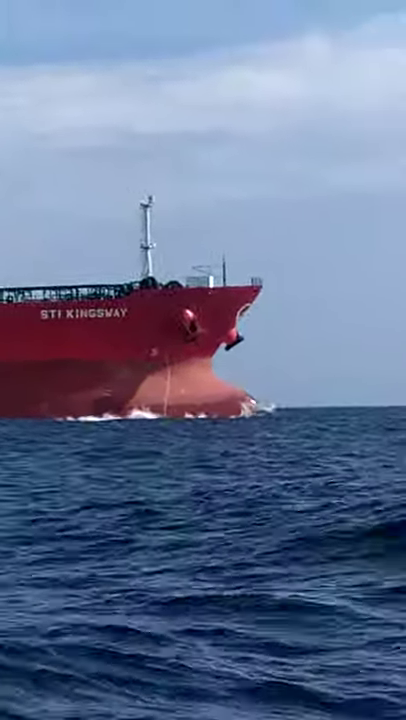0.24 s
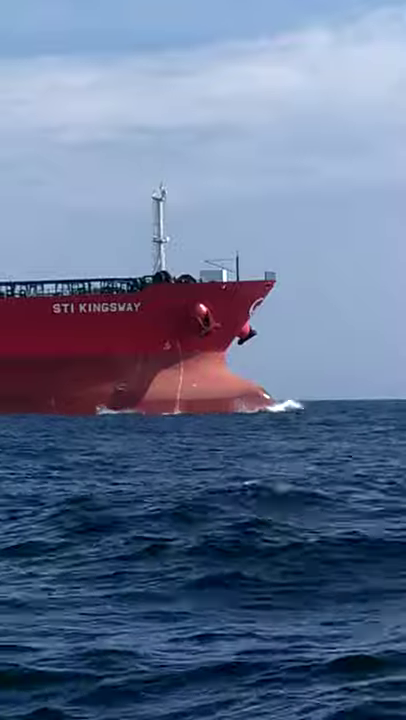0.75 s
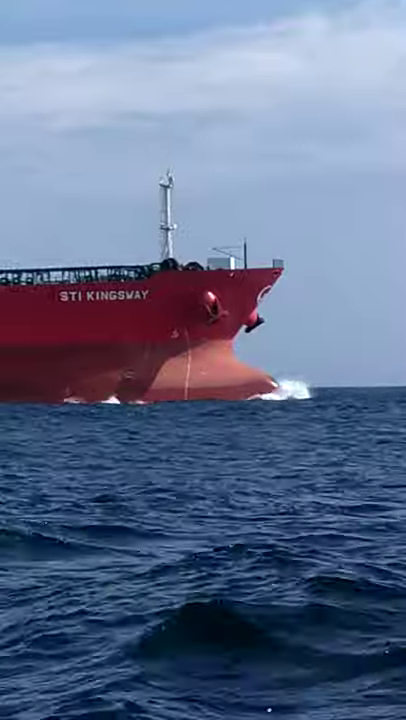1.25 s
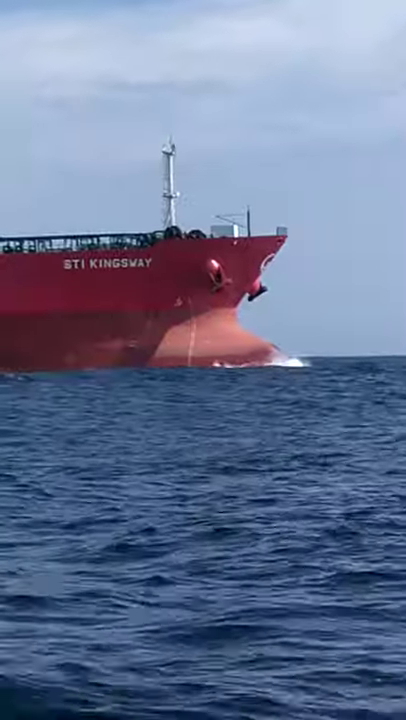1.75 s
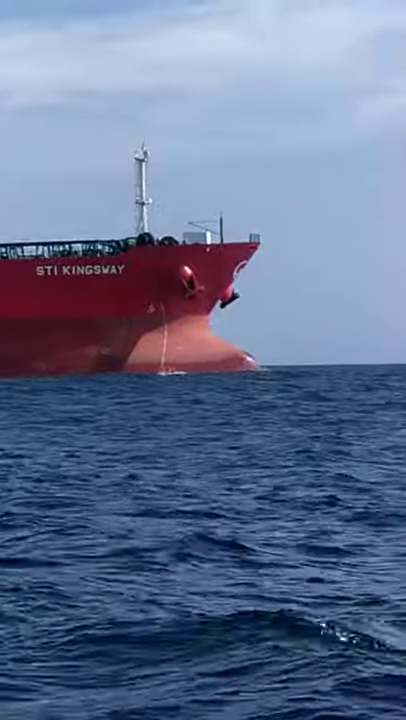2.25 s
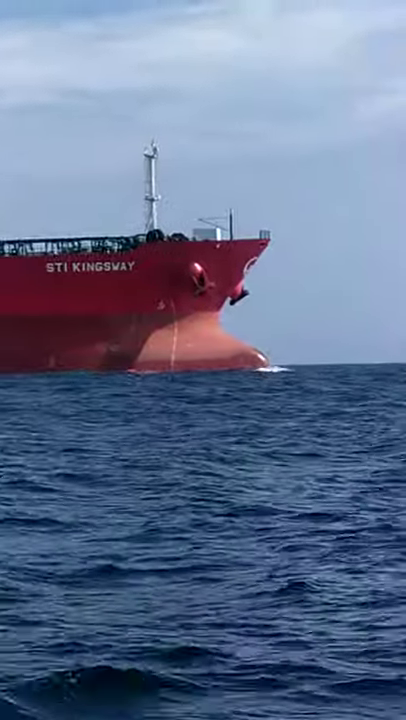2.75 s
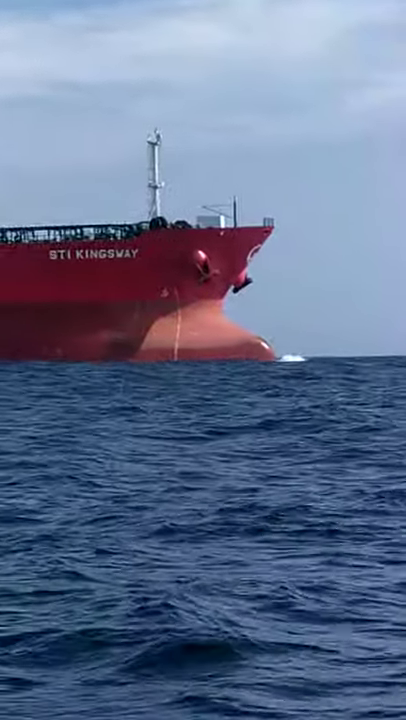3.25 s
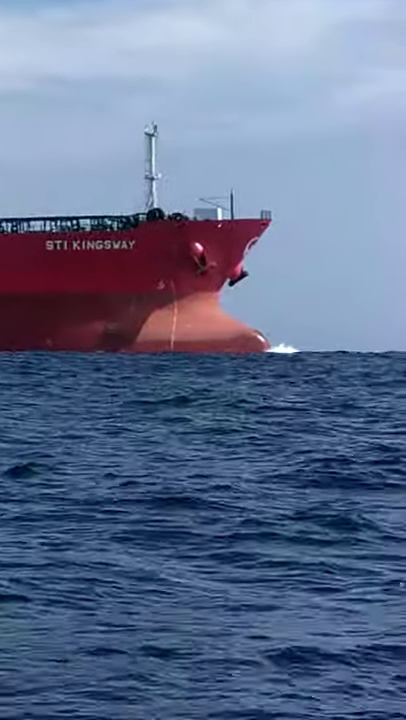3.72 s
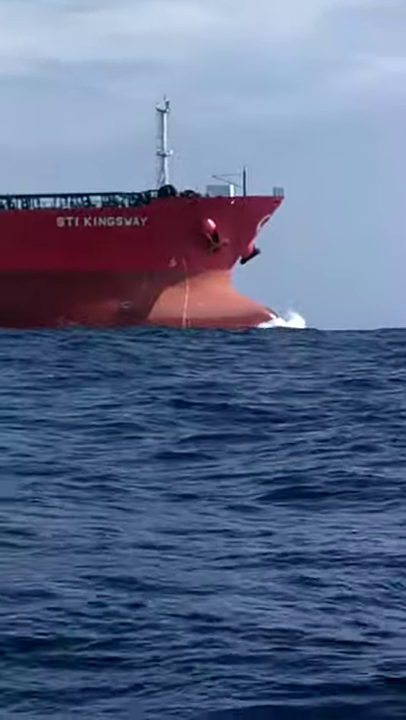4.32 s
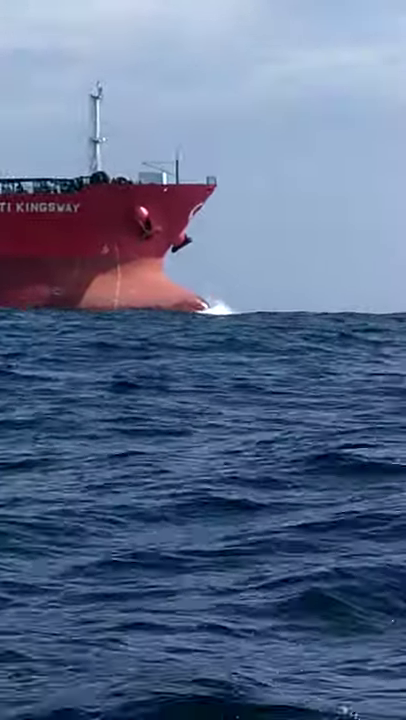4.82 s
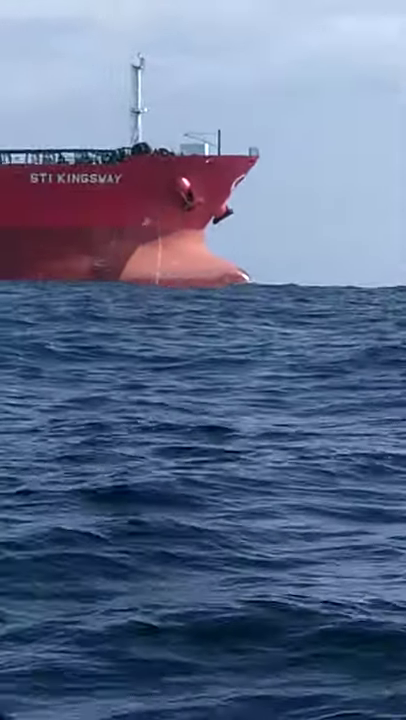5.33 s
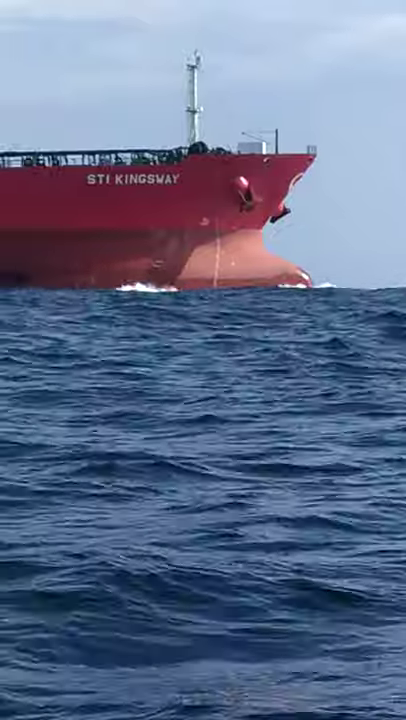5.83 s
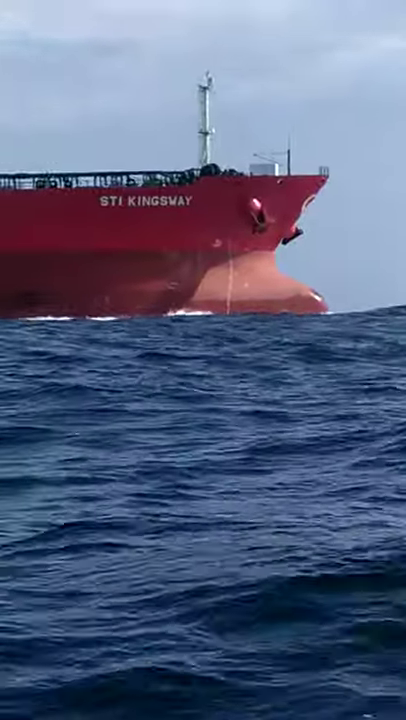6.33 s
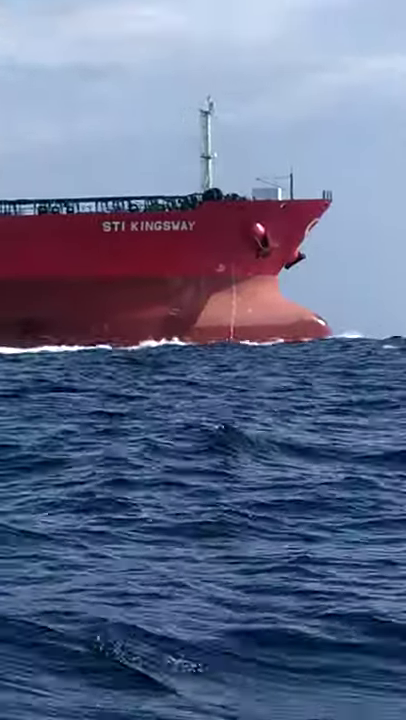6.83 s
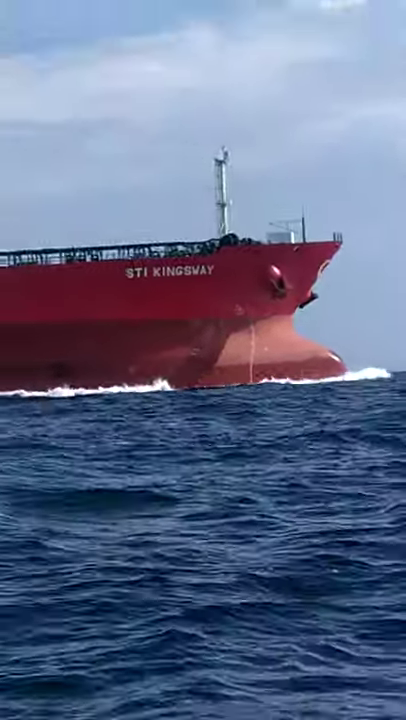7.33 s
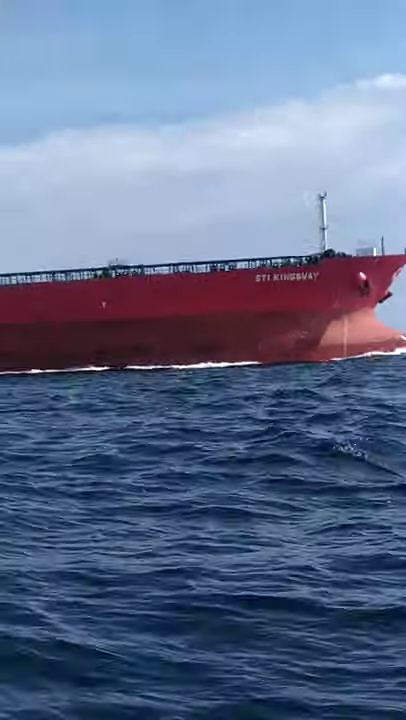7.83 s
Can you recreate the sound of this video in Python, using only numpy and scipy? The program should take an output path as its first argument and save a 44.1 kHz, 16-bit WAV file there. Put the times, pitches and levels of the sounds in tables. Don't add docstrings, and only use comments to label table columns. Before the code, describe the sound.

At sea, heard from a small motorboat, a big ship's low horn is already sounding, holds for over two and a half seconds and cuts off. The boat engine drones and ticks in the gap amid wind buffeting and light spray. A second long blast then holds to the end while the engine slows and a loose panel rattles. Stereo handheld microphone, overloaded by wind.

```python
import sys
import numpy as np
from scipy import signal
from scipy.io import wavfile
from scipy.ndimage import uniform_filter1d, minimum_filter1d

SR = 44100
rng = np.random.default_rng(int(sys.argv[2]) if len(sys.argv) > 2 else 0)


def decibels_to_gain(level_db):
    exponent = np.asarray(level_db, float) / 20
    return 10 ** exponent


def master_out(mix):
    frames = np.transpose(np.atleast_2d(mix))
    ceiling = np.clip(frames, -1, 1)
    pcm = np.round(ceiling * 32767).astype(np.int16)
    wavfile.write(sys.argv[1], SR, pcm)


N = 355887

# time_s, level_db, echo_path_ms (extra path
BLASTS = [
    [(0.0, -15.5, 3.5), (0.22, -10, 2), (0.65, -11, 3.5), (0.8, -14, 5), (1.67, -13, 3), (1.9, -19.5, 4),
     (2.01, -11.5, 3.5), (2.63, -13, 4), (2.68, -36, 6)],
    [(4.94, -35, 1), (4.97, -17.5, 2), (5.02, -10, 2.5), (5.87, -10.5, 2.5), (6.16, -12, 2.5),
     (6.5, -10.5, 3), (6.85, -11.5, 3), (7.3, -10.5, 3), (8.07, -10.5, 2.5)],
]
HORN_PITCHES = [135.26, 135.7]
HORN_PARTIALS = [0.5, -7.5, -19.5, -30.5, -26, -35, -40]
HORN_LAG_S = 0.000083
SEA_ECHO = 0.69
HORN_PAN_DB, HORN_SWAY_DB = 1.5, 1.5

# time_s, firing_hz
ENGINE_SPEED = [(0, 67.4), (1, 67.4), (1.4, 60.5), (1.9, 66.5), (2.56, 66.5), (3, 63.7), (3.3, 63.5),
                (3.86, 66.3), (4.3, 65.6), (4.56, 62.4), (4.9, 56.6), (5.1, 57.6), (5.5, 60.5), (6.3, 61.5),
                (6.6, 58.5), (6.95, 43.8), (7.25, 48), (8.07, 51.8)]
# time_s, drive_db
DRIVE = [(0, 2.5), (.75, 1), (1.15, -3), (1.75, -1), (2.5, 1), (2.76, 2), (3.1, 2), (3.4, 2), (3.62, 4),
         (4.2, 4.5), (4.67, 1), (5.06, 1), (5.6, -0.5), (6.6, -1.5), (6.9, -5), (7.35, -4), (7.8, 1),
         (8.07, -8)]
# firing_hz, level_db
EXHAUST = [(44, -29), (51, -24), (57, -20.5), (61, -25), (64, -22.5), (66.5, -19.5), (67.5, -22)]
# hum_hz, level_db
HUM = [(90, -21), (100, -37), (113, -15), (121, -22.5), (128, -20), (131, -22), (134, -32)]
# order (multiple of the firing rate), level_db
UPPER_ORDERS = [(1.5, -17.5), (2.5, -19), (3, -17), (4, -17), (5, -14.5), (6, -13), (7, -15.5), (7.5, -21),
                (8, -14), (9, -19), (10, -16.5), (11, -18.5), (11.5, -21.5), (12, -20.5), (13, -19),
                (14, -16.5)]
# pitch_hz, gain_db
HULL = [(100, 9), (300, -15.5), (400, -1), (465, -1), (540, -6), (630, -10), (705, -0.5), (780, -7.5),
        (900, -11)]
# pitch_hz, width_hz, level_db
CASING = [(752, 57, 5.5), (1216, 286, 2), (1650, 300, -5.5), (2100, 640, -8)]
# middle_s, length_s, lift_db
TICKING = [(.24, 0.43, 9.5), (.65, 0.52, 6), (1.5, 0.68, 7), (2.3, 0.86, 6.5), (2.8, 0.31, 13),
           (3.2, .3, 9), (3.65, 0.7, 9), (4.4, 0.46, 13), (4.95, 0.33, 5), (5.9, 0.57, 10.5), (6.4, .4, 3),
           (6.9, 0.46, -9), (7.75, 0.23, 6.5)]
# middle_s, length_s, lift_db
BUZZING = [(.3, 0.74, 6), (2.8, .25, 8), (3.9, 0.97, 11), (4.7, 0.16, 12.6), (5.1, 0.4, 15),
           (5.5, 0.42, 14), (6.1, .6, 9.9), (7.22, 0.19, 17.3), (7.48, 0.51, 14.6), (7.85, 0.34, 11)]
BEAT_FOLLOWS, UPPER_FOLLOWS, CASING_FOLLOWS = 0.4, 0.72, 1.0
UPPER_DB, CASING_DB = -21.5, -41
TICK_DB, BUZZ_DB = -43, -51
TICK_HZ, TICK_WIDTH_HZ, TICK_PAN_DB = 2222, 45, -7
BUZZ_HZ, BUZZ_WIDTH_HZ = 1345, 60
CASING_TOP_HZ, CASING_PAN_DB = 2440, 3.5
FIRING_KNOCK = 28
ENGINE_LEAD = 5

# time_s, level_db, brightness_db
WIND = [(0, -19, -4), (.1, -26.5, -15), (.7, -25, -5), (1.1, -23.5, -7), (1.5, -22, -12), (1.9, -24.5, -2),
        (2.6, -23.5, -16.5), (3.3, -26.5, -5.5), (3.7, -25, -16), (4.5, -23.5, -11.5), (4.65, -29.5, -6.5),
        (5.5, -29, -13), (6.2, -28, -16.5), (7.4, -30.5, -6), (8.07, -26, -17.5)]
# pitch_hz, density_db (per Hz)
WIND_COLOUR = [(20, -6), (50, 11.5), (90, 12), (200, 5), (400, -5), (600, -12.5), (1200, -27), (2500, -55),
               (5000, -61)]
# middle_s, length_s, lift_db
GUSTS = [(.82, 0.13, 6.5), (1.28, 0.16, 8), (1.44, .08, 3.5), (1.8, 0.22, 6), (2.05, 0.12, -6),
         (2.17, 0.095, 4.5), (2.42, 0.071, 0), (2.8, 0.22, 2.5), (3.28, 0.22, 3), (3.5, 0.11, -8.5),
         (4.2, 0.071, 3.5), (4.49, 0.072, 3.5), (6.12, 0.16, 7), (6.46, 0.074, 5), (6.7, 0.17, -4.5),
         (6.9, .1, 5), (7.9, 0.1, 5.5)]
WIND_PAN_DB, WIND_SWAY_DB = 2, 4.0
COARSE = 16

# pitch_hz, density_db (per Hz)
SPRAY_COLOUR = [(1470, -30), (2500, 0), (3140, -5), (4300, -7.5), (6290, -5.5), (11000, -10),
                (13600, -18.5), (15500, -22)]
# middle_s, length_s, lift_db
SPLASHES = [
    (1.73, .1, 0.5),
    (3.53, 0.21, 1),
    (3.84, 0.015, 2.5),
    (4.72, 0.046, -1.5),
    (5.02, 0.097, 3.5),
    (5.13, 0.11, 3),
]
SPRAY_DB, SPRAY_FOLLOWS = -39.5, 0.63
SPLASH_TOP, SPRAY_TOP_DB = 3, -1.5

# start_s, peak_db, left_right_db
POPS = [(0.097, -27, 1), (0.557, -19, 1), (1.093, -30, 1.5), (1.303, -6, 6), (1.432, -21, -9),
        (1.495, -14, 24), (1.729, -18, 15), (1.778, -22, -16), (1.852, -7.5, 7), (1.902, -15, 10),
        (2.203, -23, -2.5), (2.638, -20, 6.0), (3.267, -7.5, -23), (3.303, -10, -10), (4.17, -10, -16),
        (6.142, -15, 18), (6.233, -16, -2), (6.858, -15, 19)]

# start_s, stop_time_ms, direction (+1 or -1), port (0 left, 1 right)
LONG_SHOVES = [(0.857, 7, 1, 0), (0.876, 9, -1, 0), (1.062, 7.5, 1, 0), (1.082, 12.5, -1, 0),
               (1.211, 5.5, 1, 0), (1.483, 6, 1, 0), (1.674, 5.5, -1, 0), (1.819, 6.5, -1, 1),
               (1.835, 10.5, -1, 1), (1.931, 5.5, 1, 0), (2.152, 6, -1, 0), (2.187, 5.5, 1, 0),
               (3.011, 6.5, 1, 0), (3.306, 9.5, 1, 0), (3.374, 11, -1, 0), (3.556, 6.5, 1, 0),
               (3.698, 7, -1, 0), (3.961, 7.5, 1, 0), (6.073, 11, 1, 1)]
SHORT_SHOVES_PER_S, SHOVE_WIND_DB = 9, -22
SHORT_MIN_MS, SHORT_MAX_MS, RIGHT_SHARE = 3, 5, .15
STOP, SHOVE, SHOVE_RAMP_S = 0.83, 1.94, .0035

# time_s, peak_db
RATTLE = [(7.002, -30), (7.0497, -25), (7.1051, -29), (7.1477, -26), (7.196, -14.5), (7.2727, -18),
          (7.3444, -18.5), (7.3917, -17.5), (7.4438, -15.5), (7.5144, -19.5), (7.553, -13.5), (7.6249, -27),
          (7.6933, -20), (7.815, -23.5), (7.8541, -26), (7.9794, -40)]
# pitch_hz, level_db, t60_s
PANEL_MODES = [(1348, 0.5, 0.18), (1300, -9.5, 0.21), (1577, -8, 0.078), (1690, -14, 0.07)]

LOW_CUT_HZ, TOP_CUT_HZ = 51, 15700
LIMITER_S, CEILING = 0.0027, .735


def rms_one(x):
    return x / np.sqrt(np.mean(x ** 2) + 1e-20)


def along(rows, x):
    return np.interp(x, *np.transpose(rows))


def in_time(rows):
    s, *columns = np.transpose(rows)
    return [np.interp(np.arange(N) / SR, s, c) for c in columns]


def spells(rows):
    time = np.arange(N) / SR
    return sum(db * np.exp(-4 * ((time - s) / length) ** 2) for s, length, db in rows)


def panned(x, pan_db):
    return x * decibels_to_gain(np.array([pan_db / 2, -pan_db / 2]).reshape(2, -1))


def drift(rate, channels=1, size=1):
    r = np.exp(-40 * np.pi * rate / SR)
    white = rng.standard_normal((channels, N // 20 + 4002))
    slow = signal.lfilter([1], [1, -2 * r, r * r], white)[:, 4000:]
    read = np.arange(0, N, size) / 20
    return np.array([np.interp(read, np.arange(len(row)), rms_one(row)) for row in slow])


def resonance(x, hz, width):
    r = np.exp(-np.pi * width / SR)
    poles = [1, -2 * r * np.cos(2 * np.pi * hz / SR), r * r]
    return signal.lfilter([(1 - r * r) / 2, 0, (r * r - 1) / 2], poles, x)


def bands(colour, edges, gain_db):
    white = rng.standard_normal((2, 2, N))
    colour_hz, colour_db = np.transpose(colour)
    out = 0
    for k, (low, high) in enumerate(zip(edges, edges[1:])):
        hz = np.sqrt(low * high)
        band_pass = signal.butter(2, [low, high], "band", fs=SR, output="sos")
        band = signal.sosfilt(band_pass, white[k % 2])
        density_db = np.interp(np.log(hz), np.log(colour_hz), colour_db)
        gain = decibels_to_gain(density_db + gain_db(hz))
        out = out + band * np.repeat(gain, COARSE, axis=1)[:, :N]
    return out


def horn():
    out, clock = np.zeros((2, N)), np.arange(N) / SR
    twinkle = [0.3 * k * drift(3.6)[0] for k in range(len(HORN_PARTIALS))]
    pan_db = HORN_PAN_DB + HORN_SWAY_DB * drift(2.2)[0]
    port_lag = HORN_LAG_S * np.array([[1], [0]])
    for blast, pitch in zip(BLASTS, HORN_PITCHES):
        span = slice(round(blast[0][0] * SR), round(blast[-1][0] * SR))
        level_db, echo_ms = np.array(in_time(blast))[:, span]
        turns = 2 * np.pi * pitch * (clock[span] - port_lag)
        tone = 0
        for k, db in enumerate(HORN_PARTIALS):
            echo_turns = 2 * np.pi * (k + 1) * pitch * echo_ms / 1000
            comb = np.abs(1 - SEA_ECHO * np.exp(1j * echo_turns)) / (1 + SEA_ECHO)
            partial = np.sin((k + 1) * turns - 0.68 * k)
            tone = tone + comb * decibels_to_gain(db + twinkle[k][span]) * partial
        out[:, span] += panned(np.sqrt(2) * tone * decibels_to_gain(level_db), pan_db[span])
    return out


def engine_orders(firing, turns, drive_db):
    beat_db = along(EXHAUST, firing) + BEAT_FOLLOWS * drive_db + 2.5 * drift(3.1, channels=2)
    hum_db = along(HUM, 2 * firing) + 0.66 * drift(4.6)
    low = decibels_to_gain(beat_db) * np.sin(turns) + decibels_to_gain(hum_db) * np.sin(2 * turns + 1)
    upper = 0
    for k, db in UPPER_ORDERS:
        order_db = db + along(HULL, k * firing) + 1.47 * drift(7.6)[0]
        upper = upper + decibels_to_gain(order_db) * np.sin(k * turns + rng.uniform(0, 2 * np.pi))
    return np.sqrt(2) * (low + decibels_to_gain(UPPER_DB + UPPER_FOLLOWS * drive_db) * upper)


def engine_casing(knocks, strokes):
    struck = knocks + FIRING_KNOCK * strokes
    casing = sum(decibels_to_gain(db + 0.88 * drift(8.3)) * resonance(struck, hz, width) for hz, width, db in CASING)
    return rms_one(signal.sosfilt(signal.butter(6, CASING_TOP_HZ, fs=SR, output="sos"), casing))


def ringing(struck, hz, width):
    return rms_one(resonance(resonance(struck, hz, width), hz, 3 * width))


def engine():
    (firing,), (drive_db,) = in_time(ENGINE_SPEED), in_time(DRIVE)
    turns = 2 * np.pi * np.cumsum(firing * (1 + .003 * drift(8.0)[0])) / SR
    orders = engine_orders(firing, turns, drive_db)
    shared = rng.standard_normal(N)
    hammer = np.array([shared, np.roll(shared, ENGINE_LEAD)]) + 0.2 * rng.standard_normal((2, N))
    knocks = hammer * (2.1 + 0.26 * np.cos(turns) + 0.046 * np.cos(turns / 2))
    strokes = np.diff(np.floor(turns / (2 * np.pi)), prepend=0)
    strokes = np.array([strokes, np.roll(strokes, ENGINE_LEAD)])
    casing = engine_casing(knocks, strokes) * decibels_to_gain(CASING_DB + CASING_FOLLOWS * drive_db + 7.5)
    shaken = (strokes + 0.0035 * knocks) * decibels_to_gain(2.4 * drift(26.0))
    buzz = ringing(shaken, BUZZ_HZ, BUZZ_WIDTH_HZ) * decibels_to_gain(BUZZ_DB + spells(BUZZING))
    taps = strokes * (1 + .55 * np.cos(turns / 2))
    tick = ringing(taps + 0.017 * hammer, TICK_HZ, TICK_WIDTH_HZ)
    tick = tick * decibels_to_gain(TICK_DB + spells(TICKING) - 5.5)
    return panned(orders, 3.1) + panned(casing + buzz, CASING_PAN_DB) + panned(tick, TICK_PAN_DB)


def wind():
    level_db, bright_db = in_time(WIND)
    lumps = drift(12.7, channels=2, size=COARSE)
    flutter = drift(36.0, channels=2, size=COARSE)

    def gain_db(hz):
        small = np.clip(np.log2(hz / 200) / 2.03, 0, 2)
        return small * (0.69 * (bright_db[::COARSE] + 16) + 3.1 * flutter) + 3.44 * lumps

    noise = bands(WIND_COLOUR, 20 * 2 ** np.arange(0, 7.6, .5), gain_db)
    pan_db = WIND_PAN_DB + WIND_SWAY_DB * drift(2.8)[0]
    return panned(noise * decibels_to_gain(level_db + spells(GUSTS) + 20), pan_db)


def spray():
    splash_db = spells(SPLASHES)
    level_db = SPRAY_DB + SPRAY_FOLLOWS * in_time(DRIVE)[0] + splash_db
    together = drift(27.0, size=COARSE)

    def gain_db(hz):
        top = np.clip(np.log2(hz / 7000), 0, 1)
        lift_db = top * (SPRAY_TOP_DB + SPLASH_TOP * splash_db[::COARSE])
        return lift_db + 0.6 * together + 1.35 * drift(24.0, channels=2, size=COARSE)

    noise = bands(SPRAY_COLOUR, 2500 * 2 ** np.arange(0, 2.7, .33), gain_db)
    return noise * decibels_to_gain(level_db + 10.5)


def pops():
    length = 700
    out = np.zeros((2, N + length))
    decay = np.exp(-np.arange(length) / 140.0)
    crackle = rng.standard_normal((len(POPS), length)) * decay
    crackle[:, :6] += 3.0 * np.sign(crackle[:, :1])
    dull = signal.butter(2, [200, 1200], "band", fs=SR, output="sos")
    crackle = signal.sosfilt(dull, crackle)
    for (s, peak_db, pan_db), burst in zip(POPS, crackle):
        start = round(s * SR)
        pop = burst / np.abs(burst).max() * decibels_to_gain(peak_db + 1.0)
        out[:, start:start + length] += panned(pop, pan_db)
    return out[:, :N]


def buffets():
    out, tick_s = np.zeros((2, N)), .01
    steps = np.arange(0, N / SR, tick_s)
    chance = rng.random((len(steps), 4))
    wind_db = np.interp(steps, *np.transpose(WIND)[:2])
    gusty = np.clip(1 + (wind_db - SHOVE_WIND_DB) / 7, 0, 1)
    shoves = list(LONG_SHOVES)
    for s, (occurs, long, way, side), gust in zip(steps, chance, gusty):
        if occurs < gust * SHORT_SHOVES_PER_S * tick_s:
            ms = SHORT_MIN_MS + long * (SHORT_MAX_MS - SHORT_MIN_MS)
            shoves.insert(0, (s, ms, np.sign(way - .5), side < RIGHT_SHARE))
    for s, ms, direction, port in shoves:
        out[int(port), round(s * SR):round((s + ms / 1000 + .0015) * SR)] = direction * SHOVE
    ramp = round(SHOVE_RAMP_S * SR) // 2 + 1
    return uniform_filter1d(uniform_filter1d(out, size=ramp), size=ramp)


def rattle():
    length = 1100
    out = np.zeros(N)
    scatter = rng.standard_normal((len(RATTLE), length)) * np.hanning(length)
    strength_db = rng.normal(0, 2.5, (len(RATTLE), len(PANEL_MODES)))
    for k, (hz, db, t60) in enumerate(PANEL_MODES):
        contacts = np.full(N + length, 1e-18)
        for (s, peak_db), burst, own_db in zip(RATTLE, scatter, strength_db[:, k]):
            start = round((s - .008) * SR)
            contacts[start:start + length] += burst * decibels_to_gain(peak_db + db + own_db - 32.5)
        r, w = decibels_to_gain(-60 / (t60 * SR)), 2 * np.pi * hz / SR
        out += signal.lfilter([0, np.sin(w)], [1, -2 * r * np.cos(w), r * r], contacts[:N])
    return panned(out, 6.3)


def scene():
    return horn() + engine() + wind() + spray() + pops() + buffets() + rattle()


def band_limit(x):
    return signal.sosfilt(signal.butter(12, 15620, fs=SR, output="sos"), x)


def record(dry):
    held = STOP * np.tanh(dry / STOP + (dry / STOP) ** 3)
    cut = signal.sosfilt(signal.butter(4, LOW_CUT_HZ, "high", fs=SR, output="sos"), held)
    span = 2 * round(LIMITER_S * SR) + 1
    needed = minimum_filter1d(CEILING / np.maximum(np.abs(cut), CEILING), size=span)
    gain = uniform_filter1d(uniform_filter1d(needed, size=span // 2), size=span // 2)
    top_cut = signal.cheby2(8, 50, TOP_CUT_HZ * 1.31, fs=SR, output="sos")
    mix = signal.sosfilt(top_cut, cut * gain)
    return band_limit(mix)


dry = scene()
out = record(dry)
master_out(out)
```